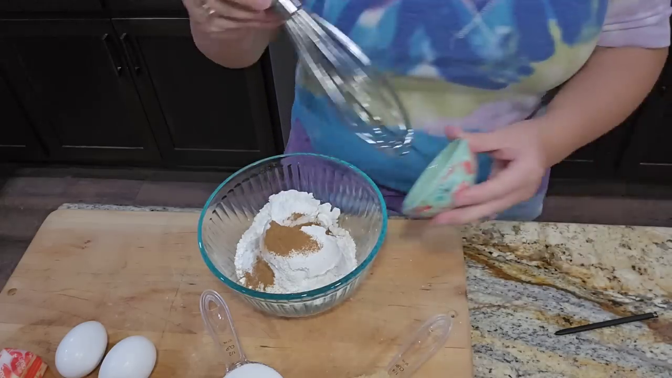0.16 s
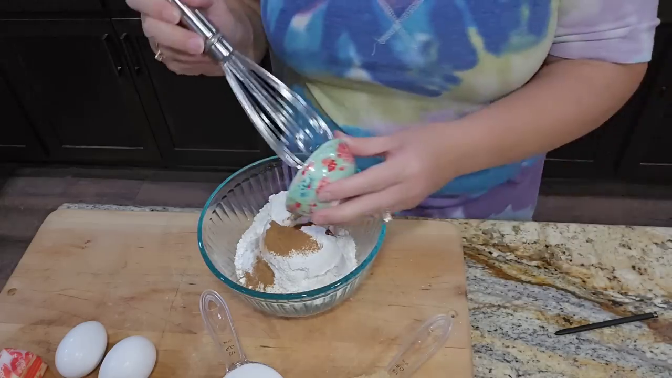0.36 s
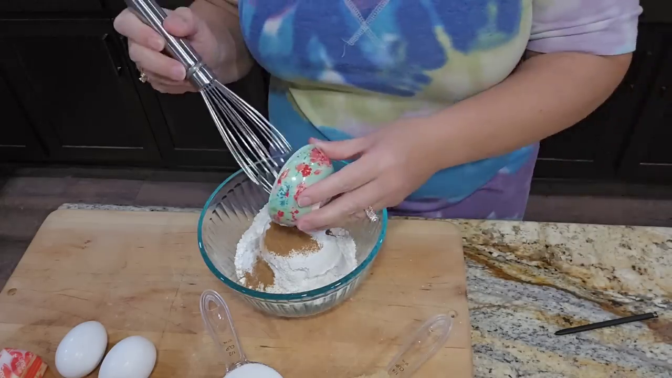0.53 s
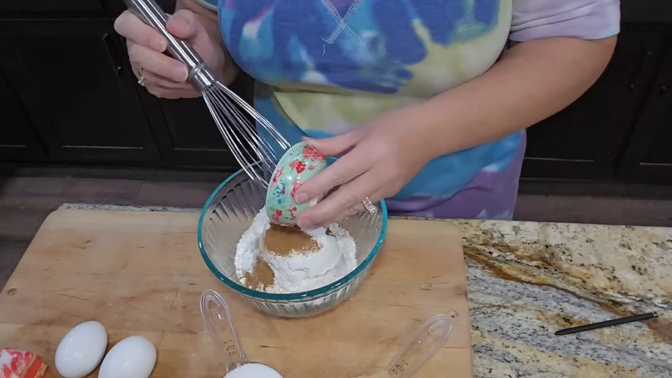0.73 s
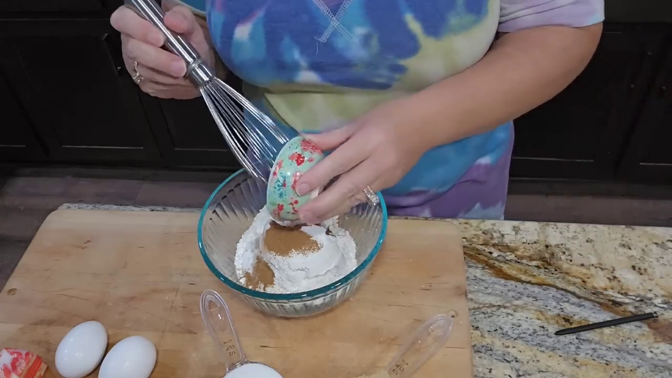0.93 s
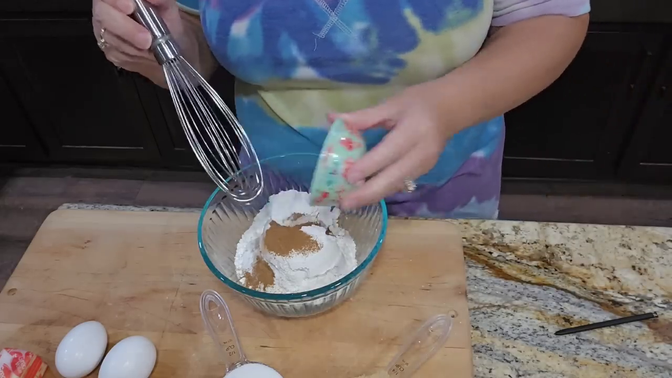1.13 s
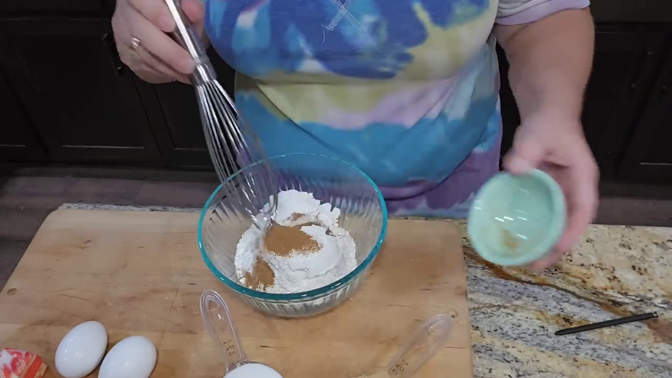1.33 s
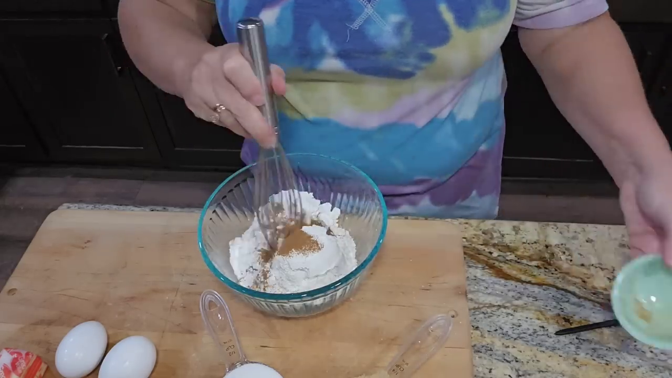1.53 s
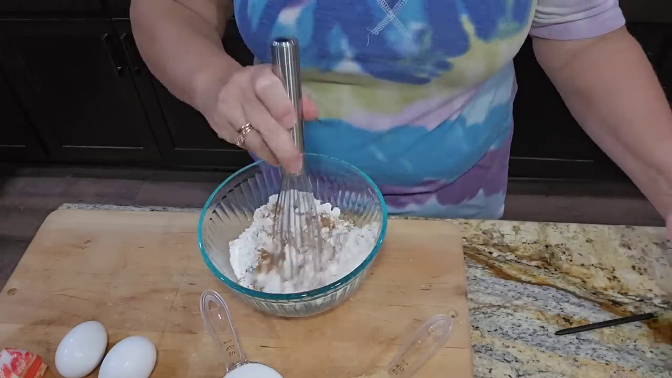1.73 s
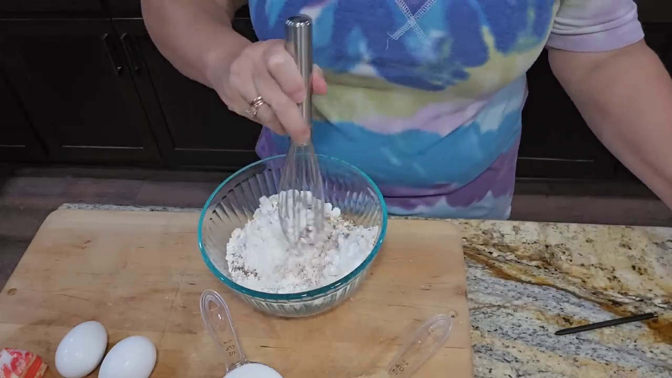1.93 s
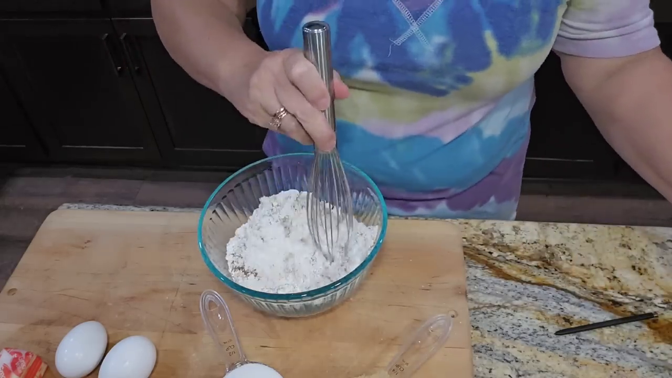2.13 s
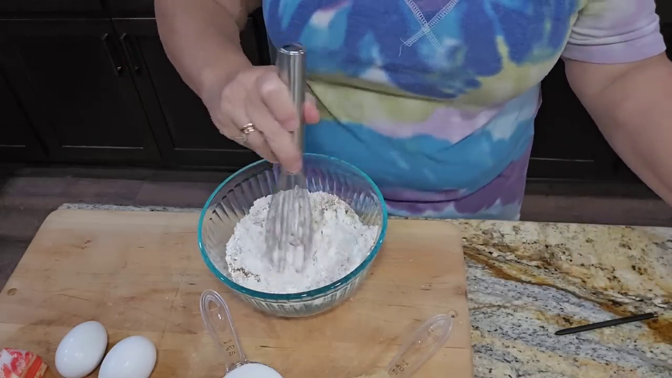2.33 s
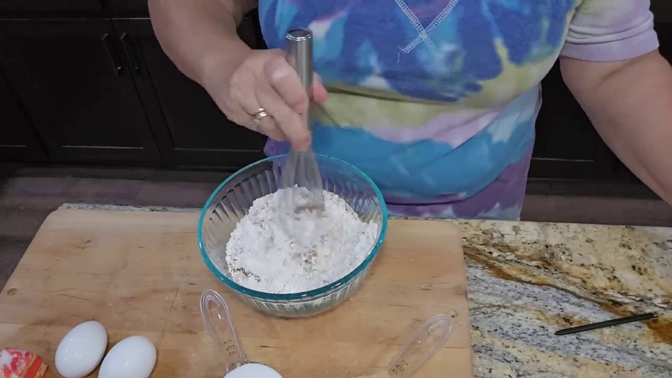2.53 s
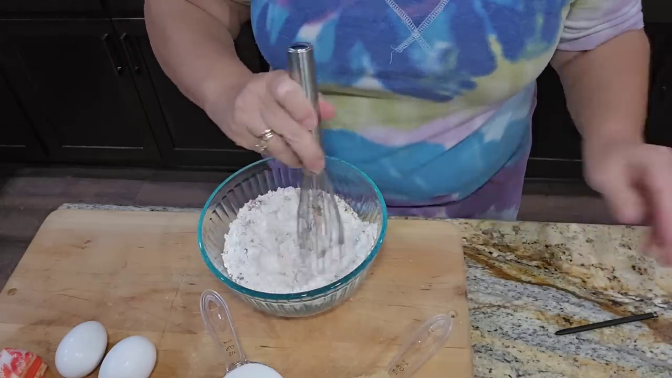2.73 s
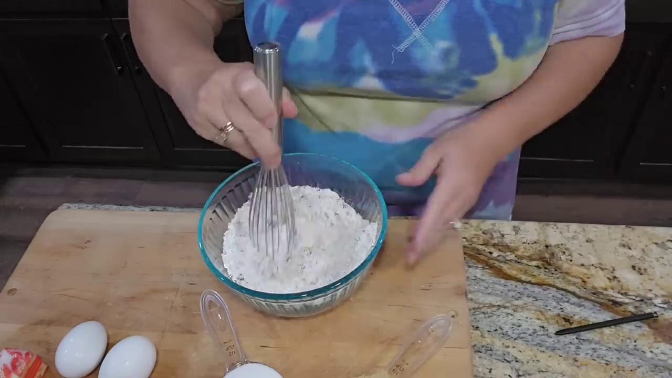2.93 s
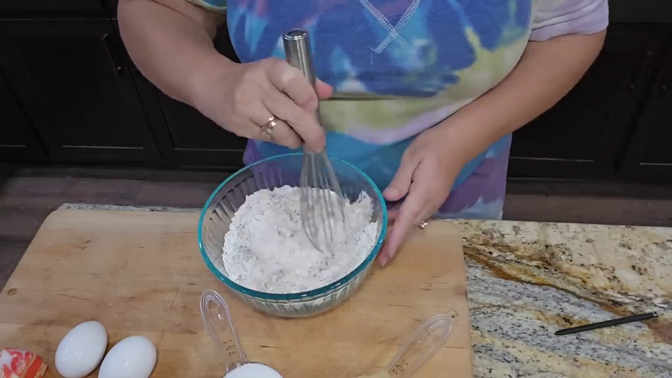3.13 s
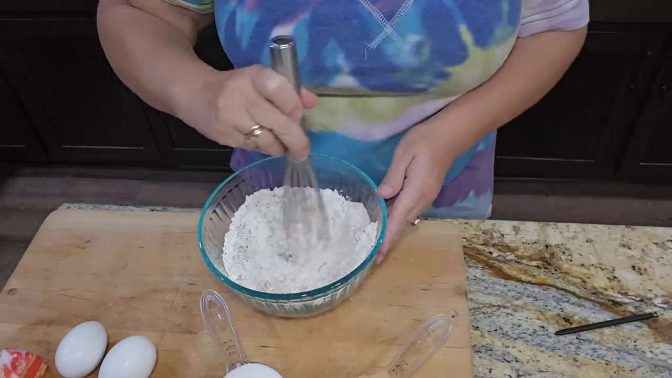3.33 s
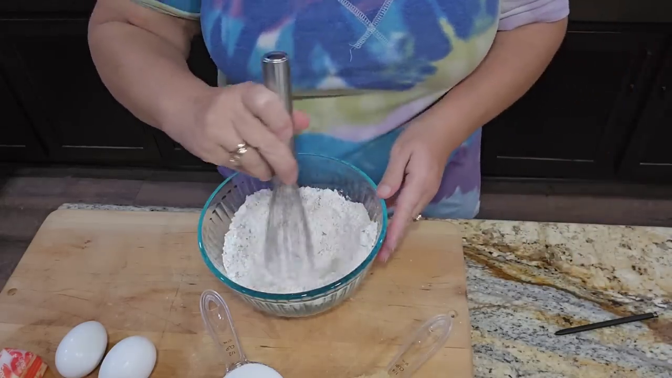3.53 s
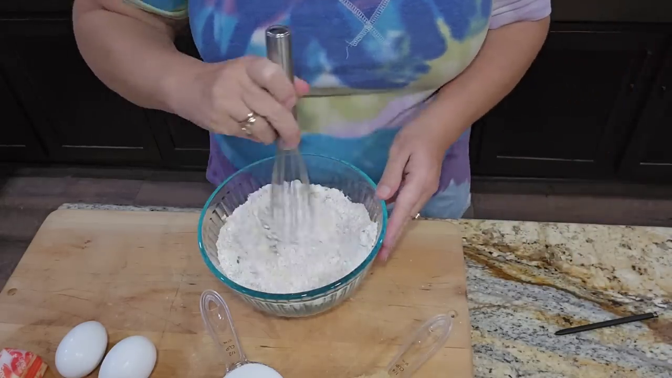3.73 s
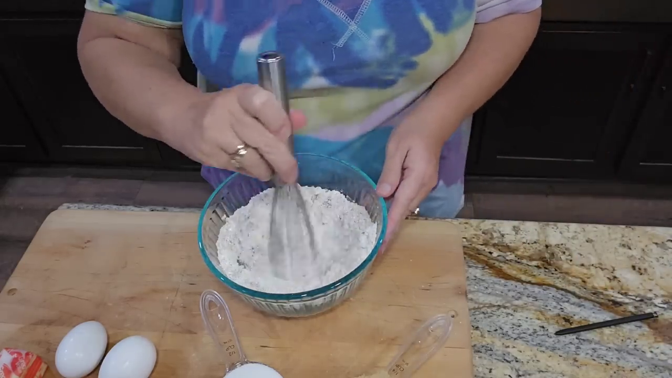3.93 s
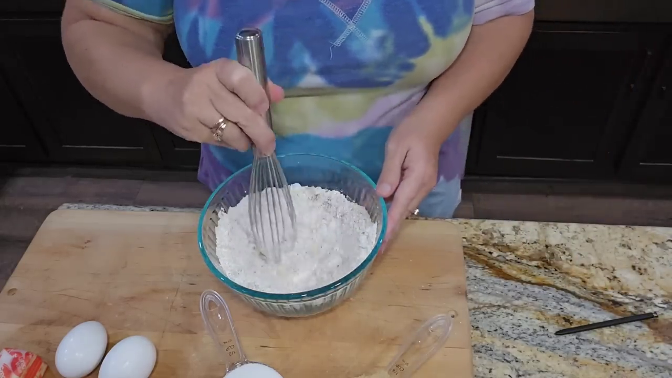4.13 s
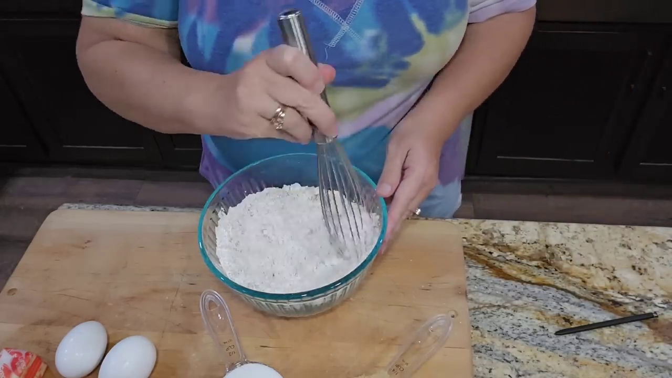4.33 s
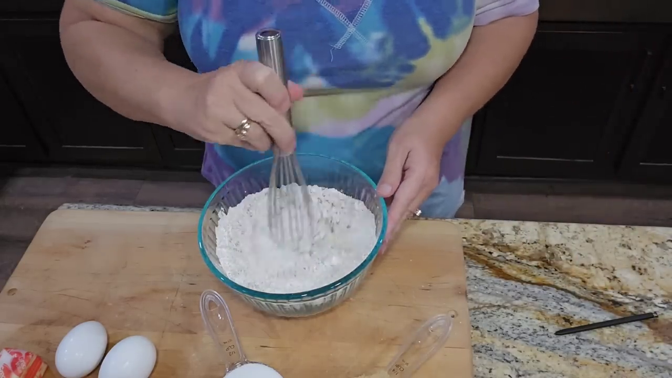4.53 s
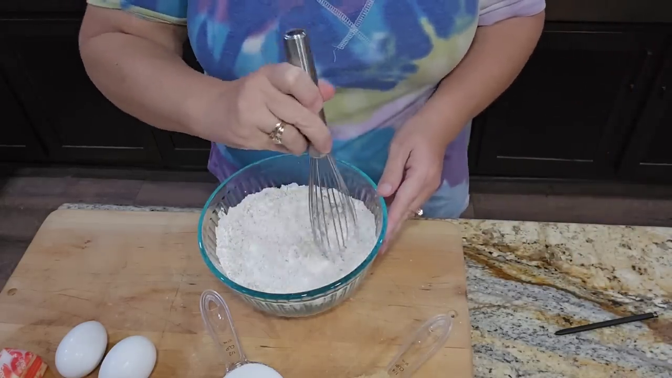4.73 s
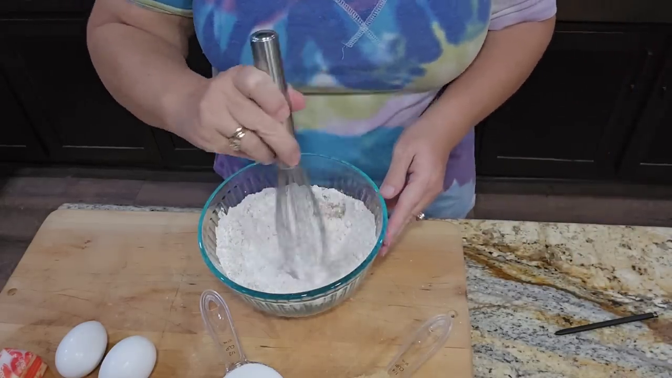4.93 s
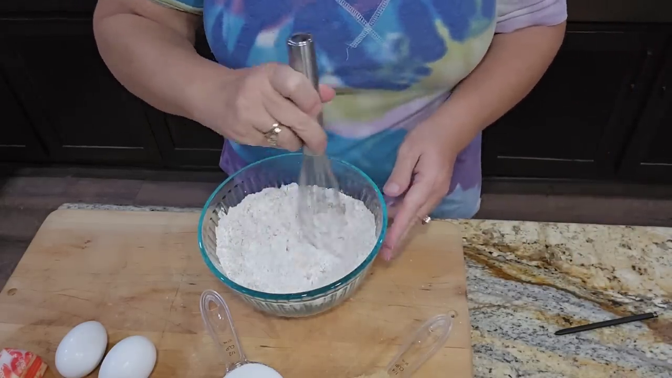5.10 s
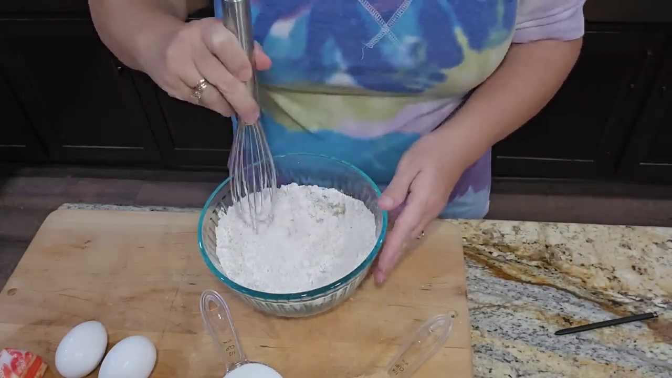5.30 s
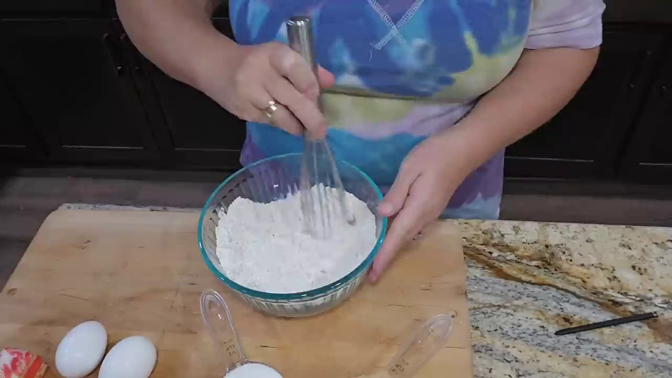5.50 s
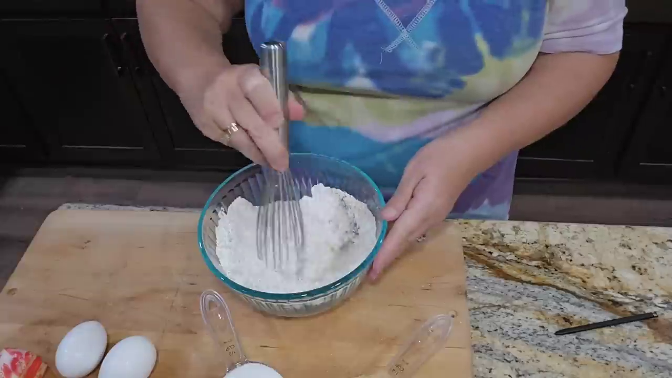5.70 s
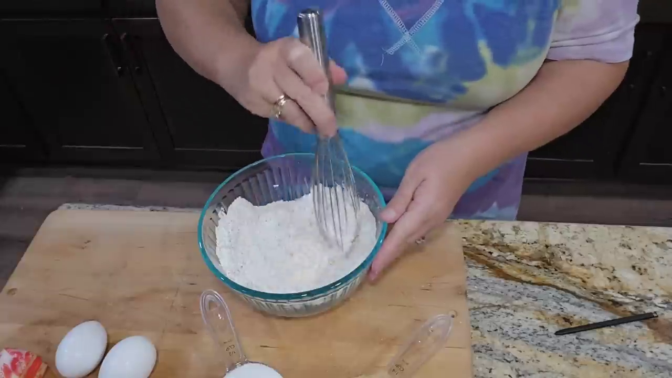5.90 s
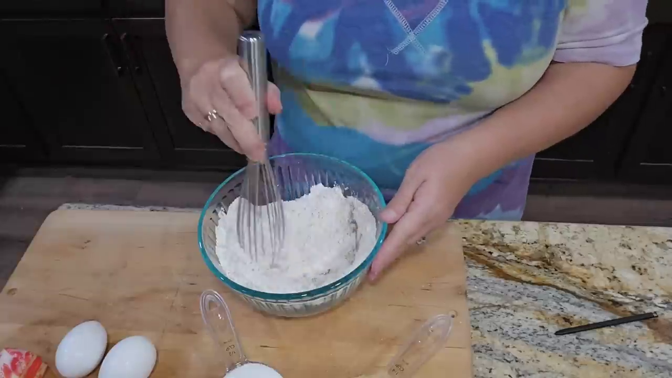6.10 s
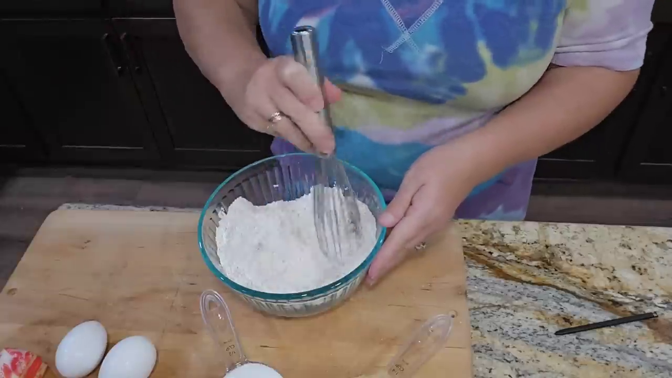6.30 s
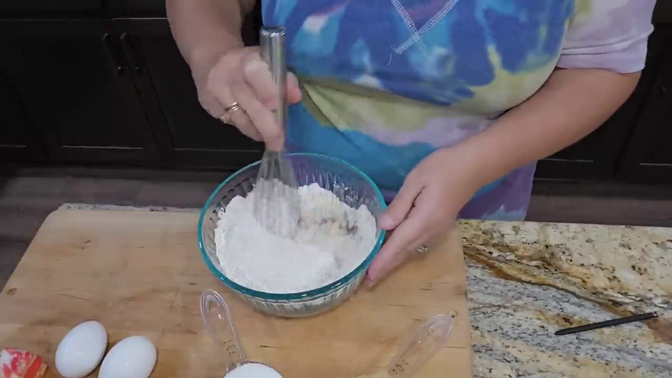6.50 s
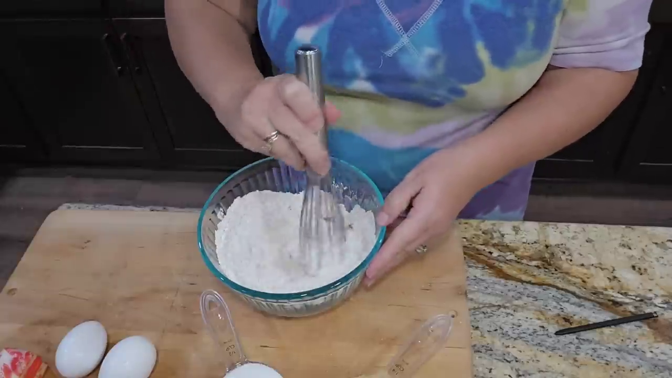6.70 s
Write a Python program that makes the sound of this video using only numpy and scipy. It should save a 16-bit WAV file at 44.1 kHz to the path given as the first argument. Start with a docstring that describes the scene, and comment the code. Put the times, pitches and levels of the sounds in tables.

```python
"""In a quiet, humming kitchen, a small ceramic bowl is tapped three times against a wire whisk to
shake spice out. The bowl rings, the handle clacks, and the wires keep slapping each other in a rattle.
The small bowl is set down and rocks on a stone counter. The whisk then swishes through flour in a
glass mixing bowl, which knocks dully on a wooden board; now and then a wire squeaks on bare glass."""
import sys
import numpy as np
from scipy import signal
from scipy.fft import rfft, irfft, next_fast_len
from scipy.io import wavfile

SR = 44100
rng = np.random.default_rng(int(sys.argv[2]) if len(sys.argv) > 2 else 0)


def transcribe(signal):
    """Save signal, clipped to [-1, 1], as a 16-bit WAV file at the path in sys.argv[1]."""
    frames = np.atleast_2d(signal).T
    limited = np.clip(frames, -1, 1)
    pcm = np.round(limited * 32767).astype(np.int16)
    wavfile.write(sys.argv[1], SR, pcm)


N = 297675
TIME = np.arange(N) / SR
AGE = TIME[:SR * 7 // 10]  # seconds since the start of one short sound

# tone of flour scraped by wire: pitch_hz, level_db
FLOUR_HISS = [(1200, -8.5), (3200, -1.5), (4300, -16.5), (5400, 2.5), (6800, -8.5), (10000, -6),
              (16000, -13)]


def from_db(db):
    """Turn decibels into a number to multiply a sound by."""
    return 10 ** (np.asarray(db) / 20)


def unit_power(x):
    """Scale a sound so that its average power is 1."""
    return x / np.sqrt(np.mean(x ** 2) + 1e-20)


def at_hz(points, hz):
    """Read a table between its rows, giving every octave equal room."""
    row_hz, value = np.transpose(points)
    return np.interp(np.log(np.maximum(hz, 1)), np.log(row_hz), value)


def add(out, start_s, sound):
    """Mix a sound in at the given time."""
    start = max(round(start_s * SR), 0)
    out[start:start + len(sound)] += sound[:N - start]


def coloured(noise, spectrum):
    """Shape the tone of a noise with rows of pitch_hz, level_db; its power comes out as 1."""
    size = next_fast_len(len(noise))
    gain = from_db(at_hz(spectrum, np.fft.rfftfreq(size, 1 / SR)))
    return unit_power(irfft(rfft(noise, size) * gain, size)[:len(noise)])


def flicker(step_s):
    """A random curve that glides to a new value between -2 and 2 at every step."""
    return np.interp(TIME / step_s, np.arange(8192), np.clip(rng.standard_normal(8192), -2, 2))


def swell(middle_s, length_s, level_db):
    """The loudness of one smooth move that grows and eases off."""
    return from_db(level_db) * np.maximum(1 - ((TIME - middle_s) * 2 / length_s) ** 2, 0) ** 2


def envelope(rise_s, hold_s, fade_s):
    """A hit swells, holds while the contact lasts, then drops 60 dB in every fade_s."""
    rise = np.sin(np.pi / 2 * np.minimum(AGE / rise_s, 1)) ** 2
    return rise * from_db(-60 * np.maximum(AGE - hold_s, 0) / fade_s)


def burst(spectrum, rise_s, hold_s, fade_s):
    """Countless short-lived tones, heard as one burst of noise."""
    return coloured(rng.standard_normal(len(AGE)), spectrum) * envelope(rise_s, hold_s, fade_s)


def ring(tones, rise_s, hold_s, scatter_db):
    """A hit wakes an object's natural tones, in a slightly different mix each time."""
    hz, level_db, fade_s = np.transpose(tones)[:, :, None]
    gain = from_db(level_db + scatter_db * rng.standard_normal(hz.shape))
    waves = np.sin(2 * np.pi * (hz * AGE + rng.random(hz.shape)))
    ringing = np.sum(gain * waves * envelope(rise_s, hold_s, fade_s), axis=0)
    return ringing / np.sqrt(np.sum(gain ** 2) / 2)


def room_tone(air_db=-51):
    """Steady air noise with the faint hum and whine of appliances."""
    # appliance tones: pitch_hz, level_db
    hum_tones = [(53.8, -60.5), (119.5, -62.5), (14400, -73)]
    # tone of the room's air: pitch_hz, level_db
    air_spectrum = [(15, -42), (25, -6.5), (130, 3.5), (344, -3.5), (451, -10.5), (818, -9), (887, -14),
                    (1610, -22.5), (2110, -24.5), (3160, -19.5), (3720, -20.5), (5140, -20.5),
                    (12500, -27.5), (14000, -23), (16000, -40)]
    hum = sum(from_db(db) * np.sqrt(2) * np.sin(2 * np.pi * (hz * TIME + rng.random()))
              for hz, db in hum_tones)
    return hum + from_db(air_db) * coloured(rng.standard_normal(N), air_spectrum)


def stirring(hiss_db=-4.5, rub_db=-4.5, rumble_db=-2.5, grain_db=6.0, handling_db=-54):
    """Wires cut through fine flour, hiss at their own pitches and shove the heap against the glass."""
    # soft swish as the whisk is brought over: time_s, level_db
    first_swish = [(0.0, -49.5), (0.25, -52.5), (0.31, -63), (0.5, -65)]
    # passes through the flour: middle_s, length_s, level_db
    strokes = [(2.08, 0.046, -55), (2.26, 0.13, -54.5), (2.425, 0.095, -48), (2.58, 0.088, -50.5),
               (2.745, 0.064, -47.5), (2.91, 0.061, -56), (3.075, 0.071, -47.5), (3.238, 0.12, -50),
               (3.386, .11, -57), (3.575, 0.063, -55.5), (3.69, 0.17, -57.5), (3.81, 0.14, -53.5),
               (3.99, 0.1, -51), (4.18, 0.15, -52), (4.37, 0.17, -57), (4.68, 0.18, -59), (5.0, 0.23, -57),
               (5.285, 0.079, -53.5), (5.398, 0.11, -48), (6.265, 0.084, -55.5), (6.465, 0.11, -58),
               (6.63, 0.13, -53)]
    # broad moves of the arm and whisk: middle_s, length_s, level_db
    shoves = [(0.08, 0.56, -53), (1.59, 0.64, -46.5), (3.189, 0.11, -46.5), (3.97, 0.78, -47),
              (6.224, 1, -50)]
    # wire tones that rubbing flour wakes: pitch_hz, width_hz, level_db
    rub_tones = [(3240, 230, -4.5), (4600, 280, -4.5), (5000, 280, -1), (5710, 230, -3)]
    # tone of the pushed heap: pitch_hz, level_db
    rumble_spectrum = [(80, -12.5), (180, -8), (400, -3.5), (650, -6.5), (1000, -11.5), (1800, -16.5),
                       (3500, -29)]
    grains = rng.standard_normal(N) * from_db(grain_db * rng.standard_normal(N))
    flutter_db = 3 * flicker(step_s=.0091)  # the loops cut the heap one after another
    scratch_db = 2.5 * flicker(step_s=.0015)  # small lumps break within each cut
    approach = from_db(np.interp(TIME, *np.transpose(first_swish))) * (TIME < first_swish[-1][0])
    cutting = sum(swell(*stroke) for stroke in strokes) * from_db(flutter_db + scratch_db)
    push = np.sqrt(from_db(handling_db) ** 2 + sum(swell(*shove) ** 2 for shove in shoves))
    rub = sum(from_db(db) * signal.lfilter(*signal.iirpeak(hz, hz / width_hz, fs=SR), grains)
              for hz, width_hz, db in rub_tones)
    hiss = from_db(hiss_db) * coloured(grains[::-1], FLOUR_HISS) + from_db(rub_db) * unit_power(rub)
    rumble = from_db(rumble_db) * coloured(rng.standard_normal(N), rumble_spectrum)
    return (approach + cutting) * hiss + push * rumble


def taps():
    """Ceramic chatters on steel for a moment: the bowl rings, the wires buzz, the handle clacks."""
    # small bowl meeting the whisk: start_s, contact_s, bowl_db, buzz_db, bright_db
    contacts = [(0.519, 0.014, -20.5, -32, -40), (0.528, 0.012, -55, -21, -32),
                (0.781, 0.028, -31, -16.5, -25), (0.987, 0.02, -21, -11.5, -19),
                (1.028, 0.0062, -56.5, -24, -18), (1.186, 0.012, -43, -38, -44)]
    # the small bowl's main tones: pitch_hz, level_db, fade_s
    bowl_tones = [(2017, -9, .045), (3220, -7, 0.07), (3363, 6, 0.084), (3450, -18, 0.063)]
    # its high, bright tones: pitch_hz, level_db, fade_s
    bright_tones = [(6600, -9, 0.081), (7700, -12.5, 0.058), (8350, 0, 0.038), (8330, 2, 0.041),
                    (8340, 3.5, .06), (10200, -5, .05)]
    # tone of the buzzing wires: pitch_hz, level_db
    buzz_spectrum = [(1500, -20), (2100, -8.5), (2700, -17), (3400, 1.5), (4400, -26.5), (6400, -8),
                     (7400, -20.5), (8450, 6.5), (9400, -10), (11800, -15.5), (13600, -2), (14300, -6),
                     (14900, -0.5), (16000, -14)]
    # clacks of the whisk's handle: start_s, contact_s, level_db
    clacks = [(0.559, 0.023, -24), (0.573, 0.0041, -11), (0.831, 0.0061, -13), (0.851, 0.0036, -17.5),
              (1.026, 0.0086, -25.5), (1.062, 0.0086, -19)]
    # the handle's hollow tones: pitch_hz, level_db, fade_s
    handle_tones = [(528, -17, 0.027), (1062, -8.5, 0.037), (1264, -16.5, 0.013), (1628, -9.5, 0.02),
                    (1814, 2.5, 0.0091), (1955, -6, 0.022)]
    out = np.zeros(N)
    for start_s, hold_s, bowl_db, buzz_db, bright_db in contacts:
        bowl = from_db(bowl_db) * ring(bowl_tones, rise_s=.0076, hold_s=hold_s, scatter_db=2.5)
        bright = from_db(bright_db) * ring(bright_tones, rise_s=.002, hold_s=hold_s, scatter_db=11.5)
        buzz = from_db(buzz_db) * jangle(buzz_spectrum, rise_s=.0072, hold_s=hold_s, fade_s=.09)
        add(out, start_s, bowl + bright + buzz)
    for start_s, hold_s, clack_db in clacks:
        # the grip shifts the handle's pitch a little, and its loose parts chatter
        tones = np.array(handle_tones) * [1 + .015 * rng.standard_normal(), 1, 1]
        chatter = from_db(3 * flicker(step_s=.001)[:len(AGE)] - .7)
        clack = ring(tones, rise_s=.005, hold_s=hold_s, scatter_db=1.5)
        add(out, start_s, from_db(clack_db) * chatter * clack)
    return out


def jangle(spectrum, rise_s, hold_s, fade_s):
    """Each contact favours its own handful of brief wire tones; thin wires give off no bass."""
    hz = np.arange(200, 16000, 130)
    favoured_db = 6.5 * np.clip(rng.standard_normal(len(hz)), -2, 2)
    bass_loss_db = 60 * np.log10(np.minimum(hz / 1700, 1))
    level_db = at_hz(spectrum, hz) + favoured_db + bass_loss_db
    return burst(np.column_stack([hz, level_db]), rise_s, hold_s, fade_s)


def echo_tail(noise, rise_s):
    """The kitchen's echoes blur together, and each octave dies away at its own pace."""
    # how long the echoes last: pitch_hz, fade_s
    echo_fades = [(200, 0.31), (700, 0.42), (1600, 0.39), (3000, 0.38), (5000, 0.32), (15000, 0.4)]
    octave = np.log2(np.clip(np.fft.rfftfreq(len(AGE), 1 / SR), 2 ** 7, 2 ** 14))
    spectrum, out = rfft(noise), 0
    for centre in range(7, 15):
        band = irfft(spectrum * np.maximum(1 - abs(octave - centre), 0), len(AGE))
        out = out + band * envelope(rise_s, rise_s, at_hz(echo_fades, 2 ** centre))
    return out


def kitchen(sound, echo_db):
    """A nearby sound with a little of the room's echo behind it."""
    echoes = echo_tail(rng.standard_normal(len(AGE)), rise_s=.0085)
    return sound + from_db(echo_db) * signal.fftconvolve(sound, echoes / np.linalg.norm(echoes))[:N]


def slaps(gap_growth=1.012):
    """Jolted loops slap almost evenly, slowing down. Gives rows of start_s, ping_hz, tick_db, ring_db."""
    # runs of slaps (a negative fade grows louder):
    # start_s, length_s, first_gap_s, ping_hz, tick_db, ring_db, fade_db_per_s
    rattles = [(0.566, 0.07, 0.02, 13700, -10.5, -21, 234), (0.653, 0.03, 0.023, 13900, -24, -29, -20),
               (0.855, 0.03, 0.0115, 13600, -21.5, -34.5, 80), (1.006, 0.08, 0.019, 13650, -22, -23.5, -5),
               (1.098, 0.055, 0.017, 13650, -16.5, -25, 190), (1.215, 0.02, 0.014, 13950, -17, -28.5, -130),
               (1.261, 0.04, 0.019, 13600, -25, -33, -70), (1.316, 0.065, 0.017, 13600, -21.5, -32, 190),
               (1.393, 0.088, 0.02, 13440, -29, -36.5, -22), (1.535, 0.01, 0.02, 13400, -47, -42.5, -3),
               (1.574, 0.025, 0.02, 13650, -46, -49.5, -50)]
    rows = []
    for start_s, length_s, gap_s, ping_hz, tick_db, ring_db, fade_db_per_s in rattles:
        ages = np.append(0, np.cumsum(gap_s * gap_growth ** np.arange(32)))
        jitter = rng.standard_normal((len(ages), 4)) * [.0005, 150, 1.5, 1.5]
        change = np.outer(ages, [1, 0, -fade_db_per_s, -fade_db_per_s])
        run = [start_s, ping_hz, tick_db, ring_db] + change + jitter
        rows.extend(run[ages <= length_s])
    return rows


def wire_rattle(overtone_count=64, loop_spread=.0021, scatter_db=2.5, bend_hz=10,
                ring_db=-1.5, tick_db=-13, free_tick_db=-21, ping_db=-4):
    """The whisk's loops swing and slap together; every slap ticks, pings and keeps them ringing."""
    # wire tones as the bowl touches, slides along and lets go: pitch_hz, touch_db, slid_db, free_db
    wire_tones = [(2248, -22, -3, -7.5), (2417, 5, -0.5, -14), (2690, -7.5, -19, -23), (3080, -1, -16, -22),
                  (3490, -17.5, -10, -6), (3640, -13, -1, -19), (4800, -20, 7, -22), (4960, 5, -3, -2.5),
                  (5060, -6, -9, -5), (5670, 6, 6, -5), (5860, -9, 6, 0.5), (6260, -3.5, 3, -7),
                  (6680, -10, 6, 6), (6810, -2, 6.5, 7), (7400, -2.5, -8, -8), (8400, 3, 15.5, -11),
                  (8470, 13, 1, -14), (8780, 2, 11, -12), (8980, 8.5, -7, -6), (9210, -2, 5, 9.5),
                  (9400, -8, 3, 4), (9792, -2, 4, 0), (11110, 0.5, 10, 4), (11970, 3, 2, -9),
                  (12635, 9, 4, -6), (13437, 3, 21, 2), (13880, 9, 23, 2), (14540, 3.5, 15, 15),
                  (15090, 10, 9, -5)]
    # the bowl's way off the wires: time_s, stage (0 first touch, 1 slid along, 2 free)
    release = [(0.9, 0), (1.0, 0.85), (1.17, 1.3), (1.3, 1.83)]
    # tone of a slap's tick: pitch_hz, level_db
    tick_spectrum = [(1500, -10), (4300, -15), (5800, -6.5), (7600, -15), (8800, -11), (14900, -15.5),
                     (16000, -31)]
    # sharp ping of wire on wire: pitch_ratio, level_db, fade_s
    ping_tones = [(1.002, -2.5, 0.018), (1.017, -11, 0.013)]
    overtone_hz = rng.uniform(4800, 15400, overtone_count)
    overtones = [(hz, -9, -9, -12) for hz in overtone_hz]
    # two nearly alike loops share each wire tone and drift in and out of step, so it shimmers
    hz, *stage_levels_db = np.vstack([wire_tones, wire_tones, overtones]).T
    hz = hz * (1 + loop_spread * rng.standard_normal(len(hz)))
    fade_s = .43 * (2000 / hz) ** .61  # higher tones die sooner
    age = AGE[:SR // 2]
    waves = np.exp(np.outer(2j * np.pi * hz - np.log(1000) / fade_s, age))
    rise_s = .005  # springy wires meet softly
    out = np.zeros(N)
    for start_s, ping_hz, slap_db, wire_db in slaps():
        stage = np.clip(np.interp(start_s, *np.transpose(release)), 0, 2)
        stage_shares = np.maximum(1 - abs(stage - np.arange(3)), 0)
        free = stage_shares[-1]
        gain = from_db(stage_shares @ stage_levels_db + scatter_db * rng.standard_normal(len(hz)))
        strike = gain / np.linalg.norm(gain) * np.exp(2j * np.pi * rng.random(len(hz)))
        # each slap finds the loops bent a little differently, which shifts their pitch
        bend = np.exp(2j * np.pi * bend_hz * rng.standard_normal() * age)
        twang = 2 * (strike @ waves * bend).real * np.minimum(age / rise_s, 1)
        tick_gain = from_db((1 - free) * tick_db + free * free_tick_db)
        tick = tick_gain * jangle(tick_spectrum, rise_s, hold_s=rise_s, fade_s=.05)
        ping = ring(np.array(ping_tones) * [ping_hz, 1, 1], rise_s, hold_s=rise_s, scatter_db=4)
        add(out, start_s - rise_s / 2, from_db(wire_db + ring_db) * twang)
        add(out, start_s - rise_s / 2, from_db(slap_db) * (tick + from_db(ping_db) * ping))
    return out


def knocks(ring_db=-3, thud_db=-12, glass_ring_db=-4, boom_db=-22, boom_hz=46):
    """The glass bowl tips and drops back on the wooden board; the counter booms below."""
    # the bowl's drops: start_s, contact_s, knock_db, glass_db, click_db
    drops = [(1.809, 0.01, -44, -64, -66), (1.872, 0.0054, -64, -64, -51.5), (3.322, 0.01, -41.5, -80, -66),
             (4.616, 0.0061, -31.5, -53, -48.5), (4.632, 0.004, -55, -53, -55),
             (4.915, 0.0016, -34, -48, -45.5), (5.214, 0.021, -32.5, -61, -59),
             (5.266, 0.004, -67, -63, -49), (5.621, 0.0057, -35, -37, -44.5),
             (5.682, 0.025, -22, -37, -42.5), (6.142, 0.028, -23, -32.5, -42.5)]
    # tones of the bowl and board together: pitch_hz, level_db, fade_s
    knock_tones = [(374.6, -2.5, 0.11), (432, 0.5, 0.099), (514.5, 9, 0.028), (540.6, -4.5, 0.27)]
    # tone of the board's thud: pitch_hz, level_db
    thud_spectrum = [(60, -0.5), (250, -2.5), (450, 3), (700, -0.5), (1100, -3.5), (1400, -52), (3000, -29),
                     (6000, -70)]
    # tones of the glass, muffled by flour: pitch_hz, level_db, fade_s
    glass_tones = [(703, 8, 0.12), (889, 7.2, 0.08), (1058, 2.3, 0.48), (1120, 6.1, 0.11)]
    # tone of the glass's click: pitch_hz, level_db
    click_spectrum = [(400, -8), (900, 7), (1900, 6.5), (3000, -7), (6000, -9.5), (15000, -11)]
    out = np.zeros(N)
    boom = np.sin(2 * np.pi * boom_hz * AGE) * envelope(rise_s=.011, hold_s=.056, fade_s=.33)
    for start_s, hold_s, knock_db, glass_db, click_db in drops:
        knock = from_db(ring_db) * ring(knock_tones, rise_s=.006, hold_s=hold_s, scatter_db=1.0)
        thud = from_db(thud_db) * burst(thud_spectrum, rise_s=.011, hold_s=.0022, fade_s=.35)
        glass = from_db(glass_ring_db) * ring(glass_tones, rise_s=.005, hold_s=hold_s, scatter_db=1.5)
        click = burst(click_spectrum, rise_s=.0011, hold_s=hold_s / 2, fade_s=.2)
        add(out, start_s, from_db(knock_db) * (knock + thud + from_db(boom_db) * boom))
        add(out, start_s, from_db(glass_db) * glass + from_db(click_db) * click)
    return out


def set_down(echo_trim_db=-.5, click_db=-10, cabinet_fade_s=.25):
    """The small bowl lands on its foot and rocks; soft contacts sound duller, and each keeps it ringing."""
    # bowl meeting stone: start_s, crack_db, echo_db, hollow_db, low_ring_db, high_ring_db, cutoff_hz
    contacts = [(2.179, -18, -21, -18.5, -25.5, -41, 3740), (2.206, -14, -17.5, -20, -31, -40, 2400),
                (2.250, -27, -28, -25.5, -46, -63.5, 2470), (2.445, -62, -56, -41, -84, -85, 798),
                (2.501, -15, -21, -21, -21, -22, 8000), (2.519, -28, -30, -18, -35, -25, 1100),
                (2.543, -13.5, -25.5, -30, -23, -19.5, 8000), (2.585, -15, -22.5, -23, -14, -35, 8000),
                (2.602, -18, -26.5, -19.5, -26.5, -21, 4500), (2.633, -12, -21, -24, -26, -30, 8900)]
    # tone of the foot's click: pitch_hz, level_db
    click_spectrum = [(700, -21.5), (2000, 3.5), (3600, 1), (4600, -6.5), (5200, -34), (6500, -44)]
    # tone of the struck counter: pitch_hz, level_db
    counter_spectrum = [(100, -29), (330, -16), (620, -9.5), (740, -2), (980, -6.5), (1100, -4), (1650, -2),
                        (2100, -2.5), (2800, -10.5), (3700, -16), (4500, -25.5), (5000, -37.5), (6500, -46)]
    # hollow tones of the counter and its cabinets: pitch_hz, level_db
    cabinet_tones = [(530, 0.5), (680, 7.5), (760, 11), (824, 9), (1110, 8), (1195, -5), (1500, 9),
                     (1660, 12.5), (1800, -6.5), (1945, -3.5), (2200, -5.5)]
    # the bowl's low and high ring: pitch_hz, fade_s
    bowl_tones = [(2035, .07), (3365, .16)]
    out, ring_powers = np.zeros(N), np.zeros((2, N))
    for start_s, crack_db, echo_db, hollow_db, low_db, high_db, cutoff_hz in contacts:
        click = from_db(click_db) * burst(click_spectrum, rise_s=.0006, hold_s=.003, fade_s=.014)
        crack = burst(counter_spectrum, rise_s=.0013, hold_s=.0038, fade_s=.041)
        counter_noise = coloured(rng.standard_normal(len(AGE)), counter_spectrum)
        echo = from_db(echo_db + echo_trim_db) * echo_tail(counter_noise, rise_s=.0092)
        # every contact wakes slightly different pitches in the counter
        tones = [(hz * (1 + .008 * rng.standard_normal()), db, cabinet_fade_s)
                 for hz, db in cabinet_tones]
        hollow = from_db(hollow_db) * ring(tones, rise_s=.007, hold_s=.014, scatter_db=2.5)
        hit = from_db(crack_db) * (click + crack) + echo + hollow
        add(out, start_s, signal.sosfilt(signal.butter(3, cutoff_hz, fs=SR, output="sos"), hit))
        for power, (_, fade_s), ring_db in zip(ring_powers, bowl_tones, (low_db, high_db)):
            swing = from_db(ring_db) * envelope(rise_s=.003, hold_s=.013, fade_s=fade_s)
            add(power, start_s, swing ** 2)
    low_ring, high_ring = (np.sqrt(2 * power) * np.sin(2 * np.pi * hz * TIME)
                           for power, (hz, _) in zip(ring_powers, bowl_tones))
    return out + low_ring + kitchen(high_ring, echo_db=-8)


def skids(grit_db=-3, width_hz=330):
    """A wire breaks through the flour, then sticks and slips on bare glass with a rough squeak."""
    # wires skidding on the glass: start_s, contact_s, pitch_hz, level_db
    squeaks = [(4.291, .031, 4200, -57), (4.57, 0.0089, 5900, -52.5), (5.23, 0.0038, 8620, -50.5),
               (5.273, 0.0051, 5770, -47.5), (5.503, 0.059, 4230, -56), (5.56, 0.034, 5750, -54),
               (5.683, 0.016, 6200, -54.5), (5.694, .006, 8700, -51), (6.148, 0.024, 5700, -51)]
    out = np.zeros(N)
    for start_s, hold_s, hz, level_db in squeaks:
        wire_filter = signal.iirpeak(hz, hz / width_hz, fs=SR)
        noise = rng.standard_normal(len(AGE))
        slips = signal.lfilter(*wire_filter, signal.lfilter(*wire_filter, noise))
        squeak = unit_power(slips[::-1]) * envelope(rise_s=.004, hold_s=hold_s, fade_s=.04)
        grit = from_db(grit_db) * burst(FLOUR_HISS, rise_s=.0011, hold_s=hold_s, fade_s=.13)
        add(out, start_s, from_db(level_db) * (squeak + grit))
    return out


def scene():
    """Everything as heard by one microphone above the board."""
    whisk = kitchen(taps() + wire_rattle() + skids(), echo_db=-11.5)
    mixing_bowl = kitchen(knocks(), echo_db=-18)
    return (whisk + mixing_bowl + set_down() + stirring() + room_tone())[None]


def record(dry):
    """The microphone drops the deep bass, and the highest treble is cut steeply."""
    low_cut_hz, high_cut_hz = 42, 15550
    without_bass = signal.sosfilt(signal.butter(5, low_cut_hz, "high", fs=SR, output="sos"), dry)
    return signal.sosfilt(signal.ellip(10, .1, 70, high_cut_hz, fs=SR, output="sos"), without_bass)


dry = scene()
out = record(dry)
transcribe(out)
```